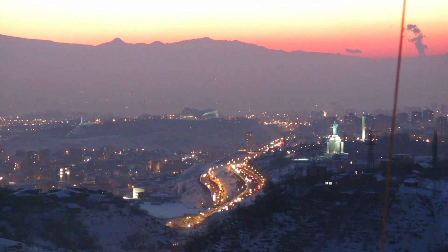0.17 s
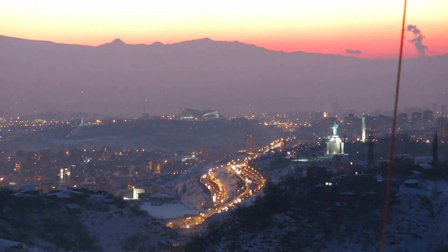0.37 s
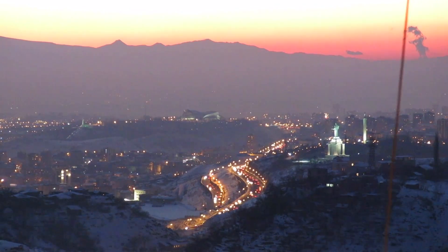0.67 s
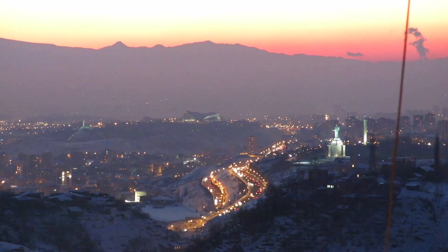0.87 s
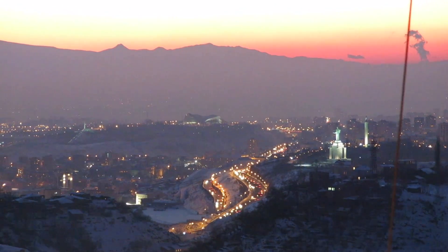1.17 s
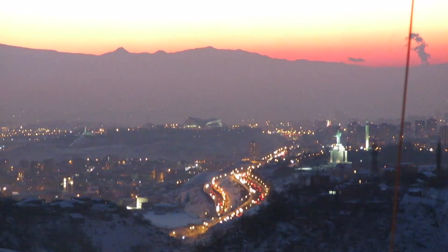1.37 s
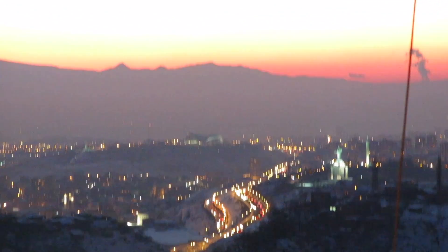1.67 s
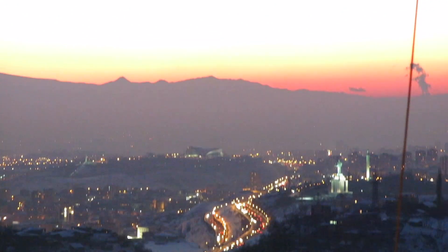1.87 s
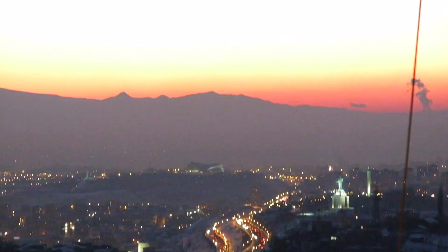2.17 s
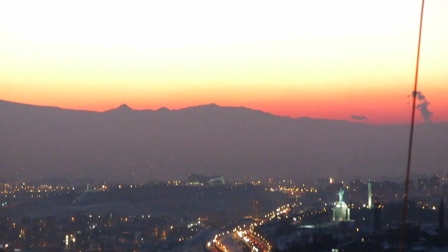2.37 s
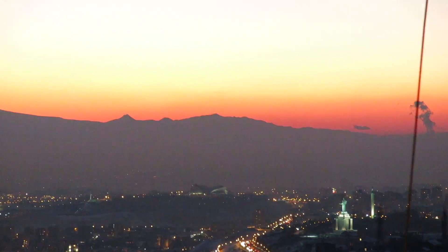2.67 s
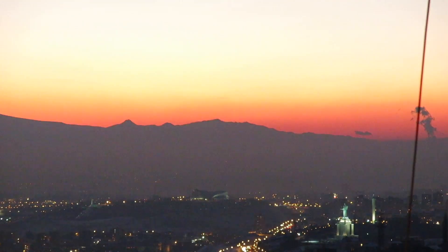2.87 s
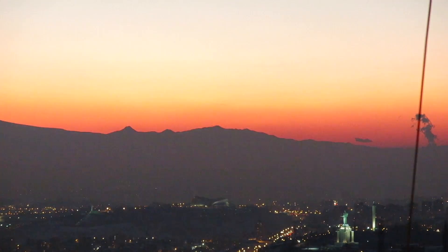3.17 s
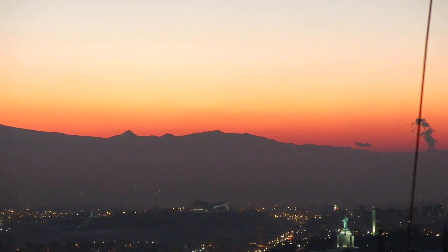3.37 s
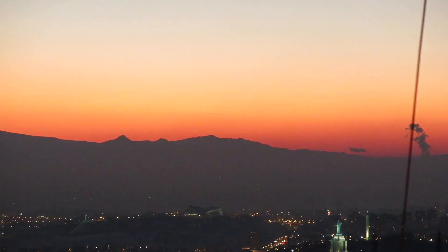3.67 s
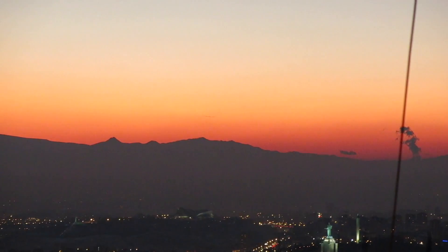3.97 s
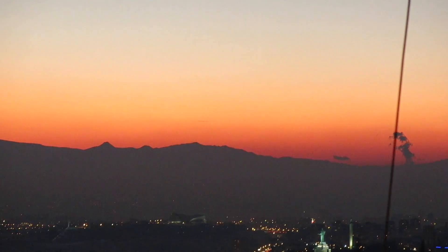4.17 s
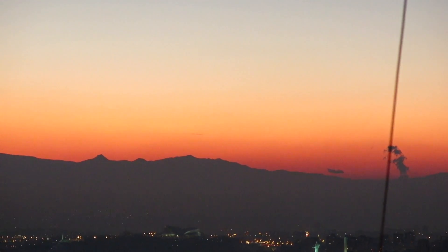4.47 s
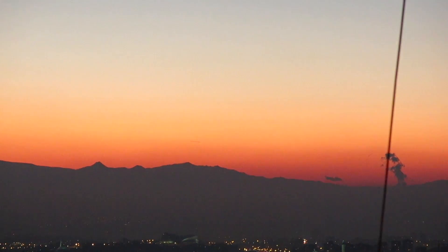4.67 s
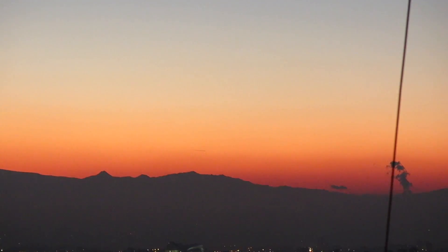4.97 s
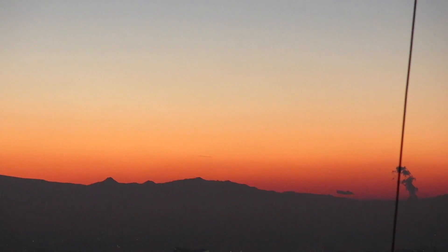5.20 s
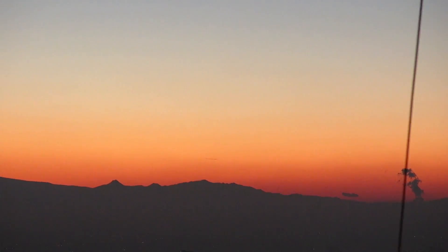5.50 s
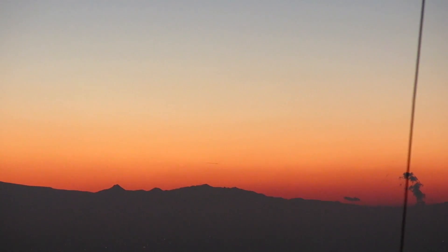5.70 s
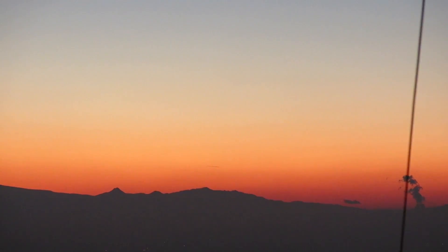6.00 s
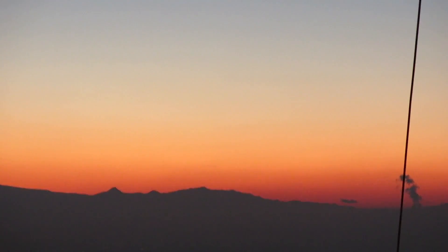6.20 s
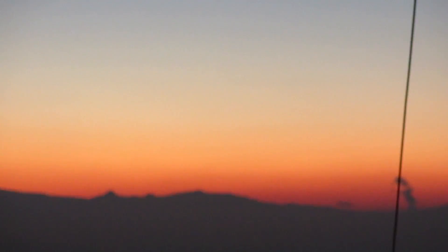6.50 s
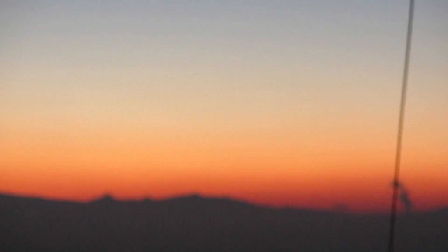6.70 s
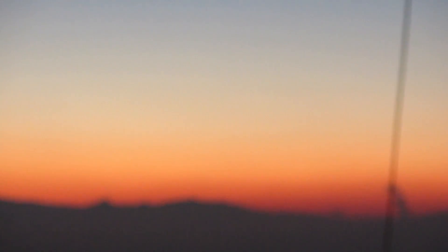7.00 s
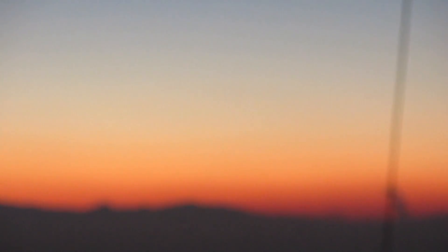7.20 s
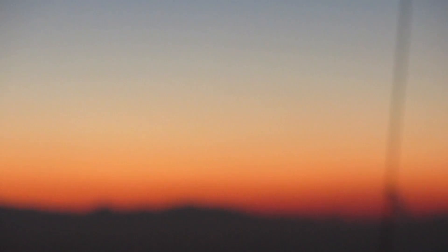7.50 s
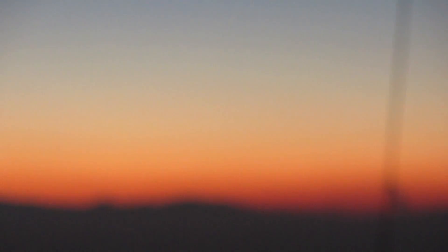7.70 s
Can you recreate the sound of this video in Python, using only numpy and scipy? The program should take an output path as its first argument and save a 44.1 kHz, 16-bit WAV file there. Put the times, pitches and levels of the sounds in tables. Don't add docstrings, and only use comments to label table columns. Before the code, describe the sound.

Dull, bass-heavy traffic wash opens and eases slightly. Very faint brake squeals and an air puff precede a lorry's rising exhaust drone, belt chirps, thin turbo whistle and brief rattle. After four seconds the throttle closes and low road-joint thumps continue. Dry clicks and a sharper knock come from the camera itself; the open hillside sound steadily fades away.

```python
import sys
import numpy as np
from scipy import signal
from scipy.fft import rfft, irfft, next_fast_len
from scipy.io import wavfile
from scipy.ndimage import uniform_filter1d, map_coordinates

SR = 44100
rng = np.random.default_rng(int(sys.argv[2]) if len(sys.argv) > 2 else 0)


def ratio_of_db(decibels):
    return 10 ** (np.asarray(decibels, float) / 20)


def generate_wav(sig):
    pcm = np.round(np.clip(np.atleast_2d(sig).T, -1, 1) * 32767).astype(np.int16)
    wavfile.write(sys.argv[1], SR, pcm)


N = 346185
T = np.arange(N) / SR

# (time [s], flow [dB])
CITY_FLOW = [
    (0.0, 2),
    (0.45, 2),
    (0.85, 0),
    (1.4, -0.5),
    (2.1, -1.5),
]
# (frequency [Hz], level [dB per Hz])
CITY_COLOUR = [(15, -61.5), (25, -39), (46, -18), (70, -4.5), (184, 0.5), (261, -9.5), (342, -8.5),
               (413, -9), (540, -7), (854, -13.5), (1180, -17), (2080, -25), (3030, -35.5), (8910, -43),
               (15700, -50.5)]
# (level [dB], growth [dB per dB of flow])
CITY_LAYERS = [
    (-36, .4),
    (-35.5, 1.09),
    (-56.5, 0.5),
]
# (time [s], length [s], frequency [Hz], glide [Hz/s], level [dB])
FAR_ENGINES = [(0.04, .12, 160.3, 7, -29), (0.39, 0.091, 162, -33, -34.5), (0.56, .06, 149.3, -57.5, -30),
               (0.85, .12, 155, 39, -37.5), (0.0, 0.061, 119, 30, -40), (0.25, 0.082, 124.5, -6, -35),
               (0.115, 0.026, 455, 85, -29), (0.2, 0.088, 460, -41, -35), (0.55, 0.14, 341.3, -3, -41),
               (1.05, 0.33, 341.5, 0.5, -43.5), (4.69, 0.018, 460, 1, -33), (4.77, 0.034, 418, 0, -33),
               (4.83, 0.062, 151.7, -29, -30), (5.04, 0.044, 150.5, 141, -34),
               (5.28, 0.21, 150.5, -48.5, -34), (5.49, 0.064, 141.7, -20, -30), (5.15, 0.089, 411, 0, -39),
               (5.62, 0.076, 400, -0.5, -39), (6.0, 0.18, 352.3, 0, -42), (6.2, 0.56, 152, 0, -38)]
# (frequency [Hz], width [Hz], level [dB])
PANELS = [(152, 4.3, 3), (198, 7.3, 2), (347, 7.7, 4), (862, 60, 1.5), (1417, 100, 2.5), (2460, 62, 0.5)]

# (time [s], peak [dB], frequency [Hz])
TICKS = [(0.737, -48, 9650), (1.3054, -53, 9020), (1.5479, -47, 6500), (1.5718, -44.5, 8130),
         (3.0753, -46, 8960), (3.5174, -41, 7570), (4.4937, -46, 11100), (5.1372, -44, 8100),
         (5.7698, -36.5, 10800), (5.882, -43, 6820), (6.29, -49, 10500), (7.058, -46.5, 9500)]
# (time [s], peak [dB])
KNOCKS = [
    (1.7512, -23.5),
    (4.8519, -18),
]
# (frequency [Hz], width [Hz], level [dB])
SOFT_SHELL = [(1250, 1300, 2), (2450, 1100, -1.5)]
# (frequency [Hz], width [Hz], level [dB])
HARD_SHELL = [(2340, 170, 4), (3850, 450, -.5), (5700, 600, -7), (7680, 500, 0), (9220, 600, -8),
              (11200, 900, -4), (12800, 900, -10)]

# (time [s], length [s], frequency [Hz], glide [Hz/s], level [dB])
BRAKE = [
    (1.34, .035, 11950, 0, -71),
    (1.42, .06, 12200, 2003, -72),
    (1.57, .02, 12900, -6000, -78),
    (1.65, .035, 12200, -10000, -73),
]
# (time [s], length [s], frequency [Hz], level [dB])
PUFFS = [
    (1.72, .05, 11300, -62),
    (4.70, .04, 14000, -76),
    (3.92, .06, 13500, -59),
]
# (time [s], length [s], frequency [Hz], glide [Hz/s], level [dB])
GEARS = [
    (3.61, .12, 2006, 0, -50),
    (3.7, .25, 2480, 0, -64),
    (3.13, .12, 6130, 0, -71),
    (3.53, .1, 6075, 0, -68),
    (3.9, .15, 6090, -100, -71),
]
# (frequency [Hz], width [Hz], level [dB])
SHIELD = [(9800, 3500, 0)]
# (time [s], shaft speed [Hz], load [dB])
CRANK = [
    (2.2, 28.0, -3),
    (2.6, 29.7, 0),
    (2.866, 31.2, 0),
    (3.24, 34.2, 0),
    (3.96, 38.67, 1.5),
    (4.1, 40.6, -18),
]
# (frequency [Hz], width [Hz], level [dB])
PIPE = [(37.6, 3.1, -47.5), (65.5, 4, -38), (73.7, 4.2, -33), (84.7, 3, -39), (91.8, 2.7, -36),
        (101.6, 3.4, -32.5), (113.2, 2.2, -41.5), (129.2, 3, -36), (138.4, 1.8, -31), (146.6, 2.3, -28.5),
        (156, 1.5, -34.5)]
# (time [s], nearness [dB], valve effort [0-1])
LORRY = [(2.0, -5.5, 0), (2.18, -4, 0), (2.4, -1, 0.37), (2.9, 0, 0.13), (3.1, 2, 0.55), (3.5, 3, 1.01),
         (3.95, 1.5, 0.95), (4.08, -0.5, 0.47), (4.4, 1.5, .35), (4.55, -3, 0.44), (4.72, 2, .35),
         (5.1, -2, 0.38), (6.0, -3.5, 0.4), (7.5, -2.5, 0.26)]
# (frequency [Hz], level [dB per Hz])
LORRY_COLOUR = [(15, -52.5), (25, -23.5), (75, -1.5), (152, 3.5), (205, -2), (268, -8.5), (342, -7),
                (727, -13.5), (878, -12), (1180, -17.5), (2020, -28), (2870, -41.5), (5950, -47),
                (9930, -50.5), (15700, -62)]
# (frequency [Hz], level [dB])
COASTING = [(2800, -4.5), (4500, 2.5), (6000, -2), (8500, -4.5), (12000, 1.5), (15500, 0)]
# (time [s], extra boom [dB])
BUMPS = [(2.45, 5.5), (3.05, 5.5), (3.35, 4), (3.72, 6.5), (4.2, 3), (4.7, 6), (5.1, 4.5), (5.7, 9),
         (6.3, 5.5), (6.8, 6), (7.3, 2.5)]
LIFT_S = 3.95

# (frequency [Hz], likeness [0-1], extra left lead [rad], left-right [dB])
FAR_PORTS = [(200, 1, 0.11, -2), (330, 0.93, 0.39, -3), (520, 1, 0.19, -1.5), (690, 0.67, 0.04, -1.3),
             (910, 0.55, -0.17, 0), (1300, 0.36, 0.75, 2), (1560, 0.59, 0.98, 5.5), (1800, 0.46, 0.5, 9),
             (2000, 0.46, 0.016, 4.5), (3170, 0.33, 0.12, 5), (3600, 0.32, -1.3, 3.5),
             (5200, 0.23, -0.36, -1), (8930, 0.41, 0.43, 0.5), (15100, 0.13, -0.67, 0.96)]
# (frequency [Hz], likeness [0-1], extra left lead [rad], left-right [dB])
NEAR_PORTS = [(200, 0.91, 0.88, -3.5), (330, 0.99, 1.24, -5.5), (522, 0.62, -0.1, -1),
              (716, 0.94, 1.6, 0.5), (876, 0.78, 0.34, 2), (1226, 0.53, 1.55, 1), (1580, 0.99, 0.86, 8),
              (1770, 0.42, 2, 4.5), (1970, 0.43, -0.03, 12), (2960, 0.44, 0.052, 9),
              (3640, 0.23, -1.4, 6.5), (5240, 0.67, -0.25, -1.12), (9000, 0.62, -0.13, -0.5),
              (15000, 0.18, -1.04, 8)]
# (start [s], aimed end [s], cut [s])
FADE = (2.83, 7.878, 7.743)


def unit(x):
    return x / np.sqrt(np.mean(x ** 2) + 1e-20)


def along(points, hz):
    f, *cols = np.transpose(points)
    return [np.interp(np.log(hz + 1), np.log(f + 1), c) for c in cols]


def curves(rows):
    s, *cols = np.transpose(rows)
    return [np.interp(T, s, c) for c in cols]


def window(rows, edge):
    opening = np.clip((T - rows[0][0]) / edge + 1, 0, 1)
    closing = np.clip((rows[-1][0] - T) / edge + 1, 0, 1)
    return opening * closing


def bell(s, span):
    return np.exp(-((T - s) / span) ** 2)


def wobble(rate):
    return map_coordinates(rng.standard_normal(int(N * rate / SR) + 4), [T * rate])


def tone(hz, blur_hz, rate):
    return np.sqrt(2) * np.sin(2 * np.pi * np.cumsum(hz + blur_hz * wobble(rate)) / SR)


def drones(rows, blur_hz, rate):
    total = np.zeros(N)
    for s, span, hz, glide, db in rows:
        pitch = hz + glide * np.clip(T - s, -2 * span, 2 * span)
        total += ratio_of_db(db) * bell(s, span) * tone(pitch, blur_hz, rate)
    return total


def filtered(x, response):
    m = next_fast_len(N + 8192)
    return irfft(rfft(x, m) * response(np.fft.rfftfreq(m, 1 / SR)), m)[..., :N]


def modes(table):
    def response(f):
        total = 0
        for k, (centre, width, db) in enumerate(table):
            damping = 1j * f * width
            total = total + (-1) ** k * ratio_of_db(db) * damping / (centre * centre - f * f + damping)
        return total
    return response


def coloured(spectrum):
    def gain(hz):
        panels_db = sum(db / (1 + ((hz - c) / w) ** 2) for c, w, db in PANELS)
        return ratio_of_db(along(spectrum, hz)[0] + panels_db)
    return gain


def patchy(depth_db):
    z = signal.stft(rng.standard_normal((3, N)), nperseg=512)[2]
    field = rng.standard_normal(z.shape[1:])
    field = uniform_filter1d(uniform_filter1d(field, 6, 0), 14, 1)
    return signal.istft(z * ratio_of_db(depth_db * unit(field)), nperseg=512)[1][:, :N]


def ports(table, hz):
    alike, lead, tilt_db = along(table, hz)
    apart = hz ** 3.5 / (hz ** 3.5 + 221.0 ** 3.72)
    port_lag = 1e-4
    half = apart * (lead + 2 * np.pi * hz * port_lag) / 2
    left = ratio_of_db(apart * tilt_db / 2) * np.exp(1j * half)
    right = ratio_of_db(-apart * tilt_db / 2) * np.exp(-1j * half)
    likeness = 1 - apart ** 2 * (1 - np.clip(alike, 0, 1) ** 0.77)
    return np.clip(likeness, 0, 1), np.array([left, right])


def placed(x, table):
    return filtered(x, lambda hz: ports(table, hz)[1])


def bands(colour, table, depth_db):
    def shared(hz):
        likeness, pair = ports(table, hz)
        return np.sqrt(likeness) * pair

    def unshared(hz):
        likeness, pair = ports(table, hz)
        return np.sqrt(1 - likeness) * abs(pair)

    def low(hz):
        return 1 / (1 + (hz / 260) ** 6)

    def high(hz):
        return 1 - 1 / (1 + (hz / 2800) ** 6)

    def middle(hz):
        return 1 - low(hz) - high(hz)

    direct, *scatter = patchy(depth_db)
    field = filtered(direct, shared) + filtered(np.array(scatter), unshared)
    return [unit(filtered(field, lambda hz: colour(hz) * part(hz))) for part in (low, middle, high)]


def line_scan_whine():
    return sum(ratio_of_db(db) * np.sin(2 * np.pi * hz * T) for hz, db in ((15734, -79), (15747.5, -85)))


def city():
    flow_db, = curves(CITY_FLOW)
    swell = .5 * wobble(2.75)
    wash = np.zeros((2, N))
    for (db, grows), part in zip(CITY_LAYERS, bands(coloured(CITY_COLOUR), FAR_PORTS, depth_db=0.4)):
        wash += ratio_of_db(db + grows * flow_db + swell + 0.36 * wobble(4.7)) * part
    return wash + placed(drones(FAR_ENGINES, blur_hz=1.65, rate=12.15), FAR_PORTS)


def camera_ticks():
    ticks, t = np.zeros(N + SR), np.arange(SR // 50) / SR
    for s, db, hz in TICKS:
        burst = rng.standard_normal(len(t)) * .8 + np.sin(2 * np.pi * hz * t)
        ticks[round(s * SR):][:len(t)] += ratio_of_db(db - 1.0 - 60 * t / 0.01) * burst
    return placed(filtered(ticks[:N], modes([(9500, 6600, 0)])), NEAR_PORTS)


def camera_knocks():
    def soft(hz):
        return modes(SOFT_SHELL)(hz) ** 2

    knocks = np.zeros(N)
    for (s, db), shell in zip(KNOCKS, (soft, modes(HARD_SHELL))):
        decay = ratio_of_db(-60 * np.clip(T - s, 0, 1) / .006)
        blow = (T >= s) * decay * .08 * rng.standard_normal(N)
        blow[round(s * SR)] = 1
        ring = filtered(blow, shell)
        knocks += ratio_of_db(db) * ring / abs(ring).max()
    return np.array([ratio_of_db(2.5) * knocks, ratio_of_db(-2.5) * np.roll(knocks, 2)])


def brake():
    return ratio_of_db(2.1 * wobble(40)) * drones(BRAKE, blur_hz=40.1, rate=150)


def air_valves():
    air, puffs = rng.standard_normal(N), np.zeros(N)
    for s, span, hz, db in PUFFS:
        hiss = unit(filtered(air, lambda f: np.exp(-((f - hz) / 1500) ** 2)))
        puffs += ratio_of_db(db) * bell(s, span) * hiss
    return puffs


def belt():
    first_s, turn_s = 2.2363, .0762
    pitch_hz, sag_hz = 10080, 45
    slip_db, grip_db = -53.5, 4.5
    chirps, blur_hz = np.zeros(N), 170 * wobble(400)
    for k in range(7):
        u = np.clip((T - first_s - k * turn_s + .01) / 0.019, 0, 40)
        db = slip_db + grip_db * np.exp(-(k - 1.3) ** 2) + rng.normal(0, 1.2)
        hz = (pitch_hz - k * sag_hz) * (1 - .004 * u) + blur_hz
        chirps += ratio_of_db(db - 6.0) * u * np.exp(1 - u) * np.sin(2 * np.pi * np.cumsum(hz) / SR)
    return chirps


def turbo():
    spool_s, spool_hz, full_hz = 2.5, 7700, 13700
    drag_s, drag_power = .175, .25
    boost_hz = np.minimum(spool_hz * np.exp(.49 * (T - spool_s)), full_hz)
    hz = boost_hz / (1 + np.clip(T - LIFT_S, 0, None) / drag_s) ** drag_power
    db = -69.3 + 1.5 * (T < LIFT_S)
    db = db - 1.6 * np.clip(hz / 1000 - 8.5, 0, None)
    db = db - 2.5 * np.clip(8.5 - hz / 1000, 0, None)
    opening = np.clip((T - spool_s) / .25, 0, 1)
    blur_hz = 110 + 90 * window(CRANK, .1)
    return opening * ratio_of_db(db + 2.5 * wobble(25)) * tone(hz, blur_hz, rate=400)


def gear_whine():
    return ratio_of_db(3.5 * wobble(40)) * drones(GEARS, blur_hz=20, rate=150)


def shield_rattle(turns):
    peak_s, span_s, sharpness = 3.444, .17, 5
    blows = np.exp(sharpness * (np.cos(2 * np.pi * (turns - turns[round(peak_s * SR)])) - 1))
    shield = unit(filtered(rng.standard_normal(N), lambda hz: modes(SHIELD)(hz) ** 2))
    return ratio_of_db(-47.5 + 2.5 * wobble(30)) * bell(peak_s, span_s) * blows * shield


def exhaust_orders(shaft, turns, load_db):
    orders = np.zeros(N)
    for k in range(1, 5):
        power = sum((ratio_of_db(db) / (1 + ((k * shaft - c) / w) ** 2)) ** 2 for c, w, db in PIPE)
        orders += np.sqrt(power) * np.sin(2 * np.pi * k * turns)
    return np.sqrt(2) * ratio_of_db(load_db) * orders


def engine_noise(turns, load):
    boom, roar, clatter = bands(coloured(LORRY_COLOUR), NEAR_PORTS, depth_db=1.18)
    coasting = filtered(clatter, lambda hz: ratio_of_db(along(COASTING, hz)[0]))
    clatter = load * clatter + (1 - load) * coasting
    near_db, effort = curves(LORRY)
    bumps_db = sum(db * bell(s, 0.061 + 0.1 * max(s - LIFT_S, 0)) for s, db in BUMPS)
    boom_db = -36.5 + 0.88 * near_db + bumps_db
    roar_db = -34 + near_db + 0.83 * wobble(5.5)
    clatter_db = -56.5 + 0.27 * near_db + 9.5 * effort
    beat = ratio_of_db(1.3 * load * np.cos(4 * np.pi * turns) + 0.61 * wobble(14))
    arrived = np.clip((T - LORRY[0][0]) / 0.39 + 1, 0, 1)
    return arrived * (ratio_of_db(boom_db) * boom + ratio_of_db(roar_db) * roar + ratio_of_db(clatter_db) * beat * clatter)


def lorry():
    shaft, load_db = curves(CRANK)
    turns = np.cumsum(shaft) / SR
    load = window(CRANK, 0.12)
    driven = load * exhaust_orders(shaft, turns, load_db) + shield_rattle(turns) + gear_whine()
    whistles = turbo() + brake() + belt() + air_valves()
    return engine_noise(turns, load) + placed(driven + whistles, NEAR_PORTS)


def scene():
    return city() + camera_ticks() + camera_knocks() + lorry()


def top_cut(x):
    return signal.sosfilt(signal.butter(12, 15800, fs=SR, output="sos"), x)


def record(dry):
    heard = filtered(dry, lambda hz: (hz < 15780) / np.sqrt(1 + (hz / 14500) ** 10))
    start_s, end_s, cut_s = FADE
    fade = np.clip((end_s - T) / (end_s - start_s), 0, 1)
    cut = np.clip((cut_s - T) / 0.0047, 0, 1)
    return top_cut((heard + line_scan_whine()) * fade * cut)


dry = scene()
out = record(dry)
generate_wav(out)
```